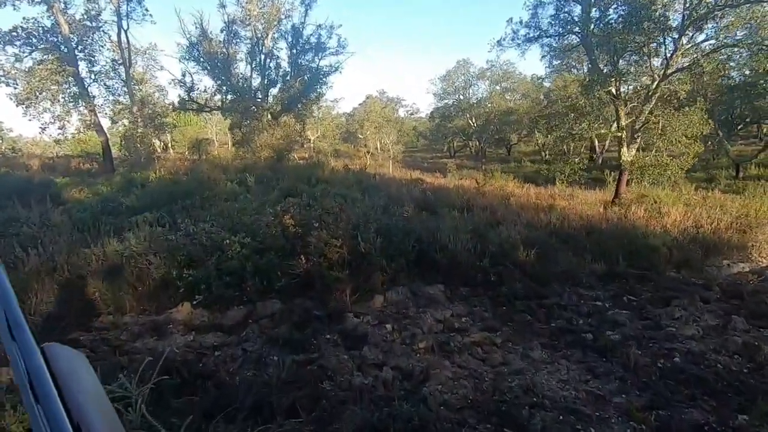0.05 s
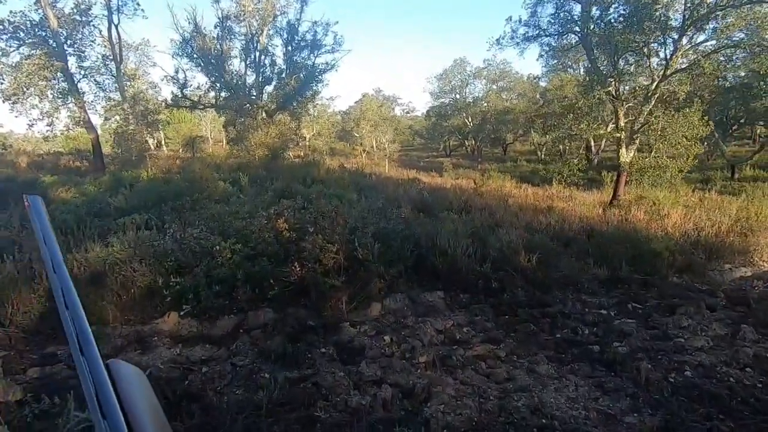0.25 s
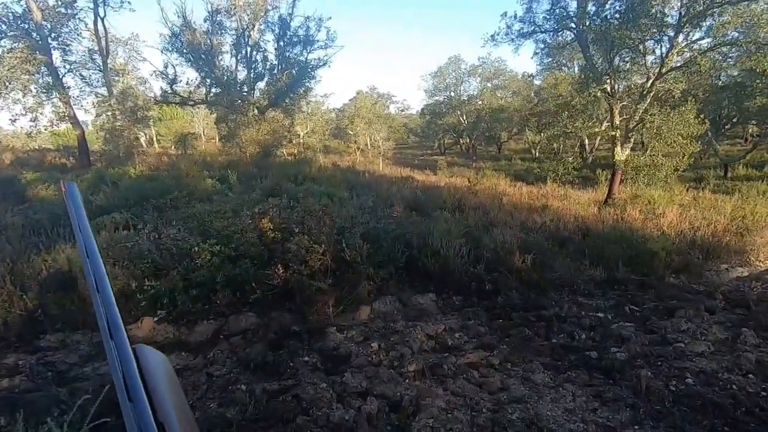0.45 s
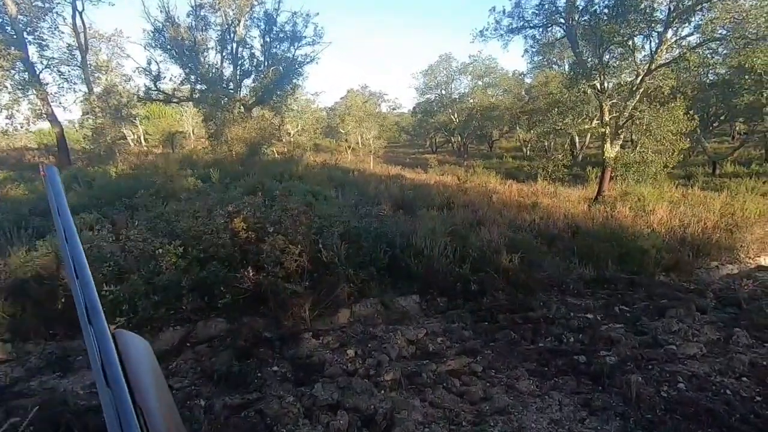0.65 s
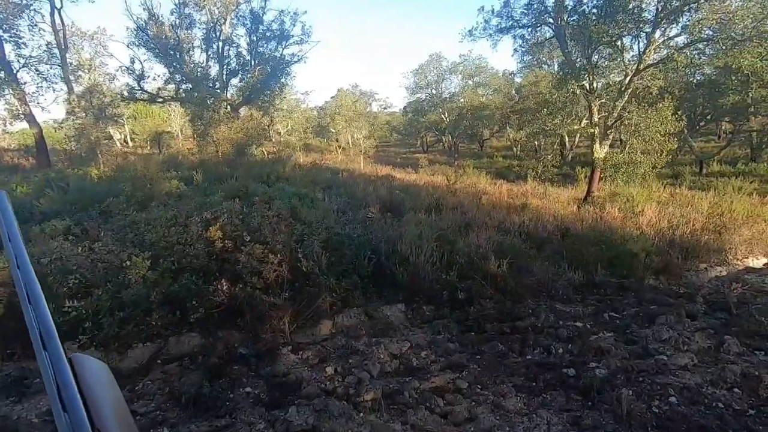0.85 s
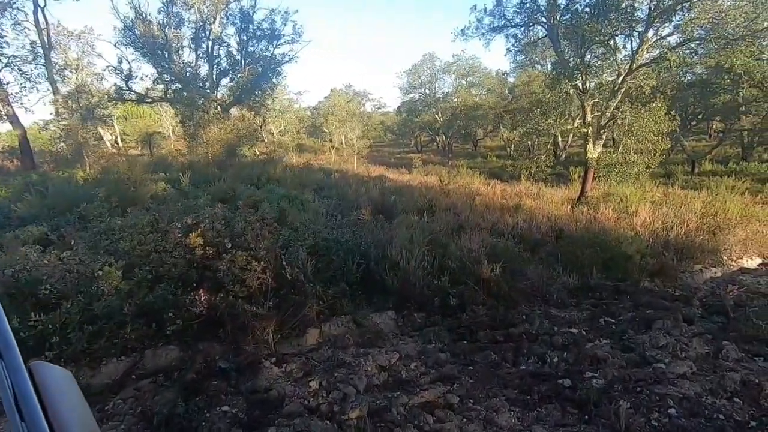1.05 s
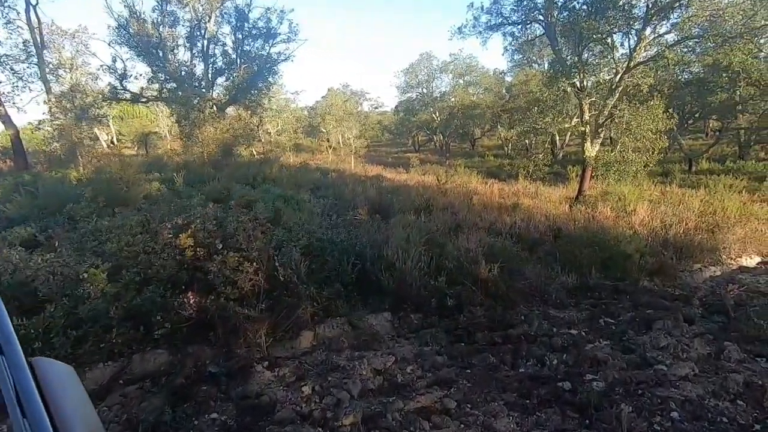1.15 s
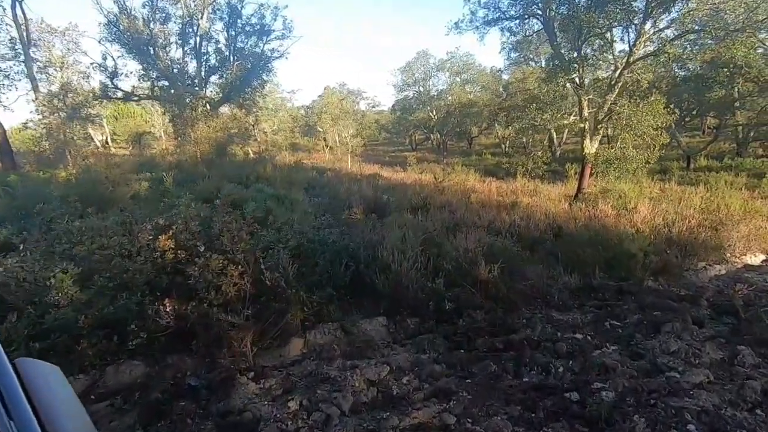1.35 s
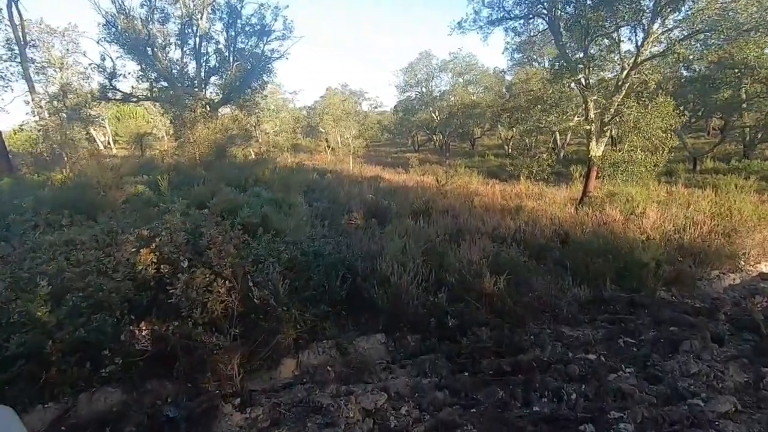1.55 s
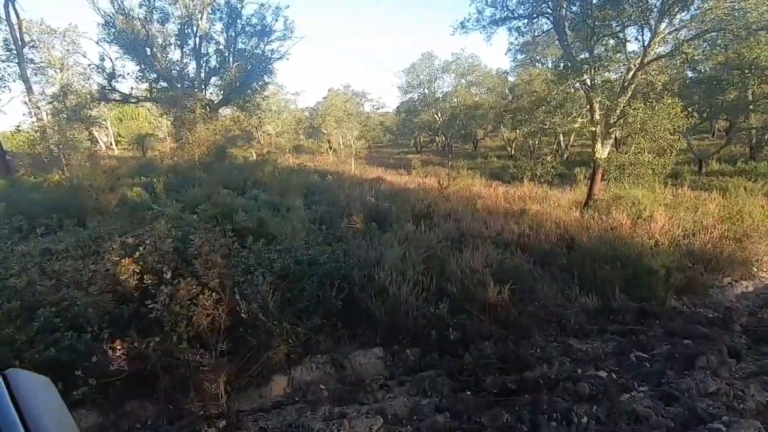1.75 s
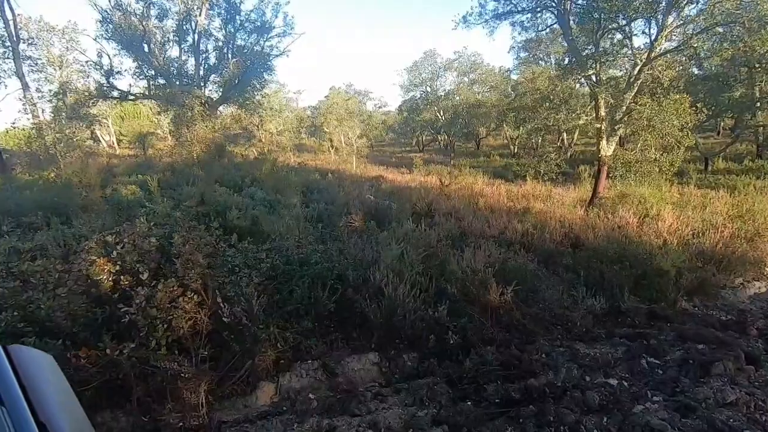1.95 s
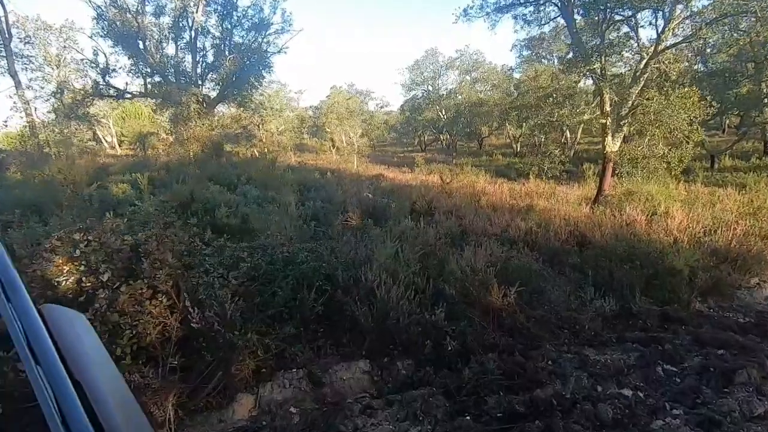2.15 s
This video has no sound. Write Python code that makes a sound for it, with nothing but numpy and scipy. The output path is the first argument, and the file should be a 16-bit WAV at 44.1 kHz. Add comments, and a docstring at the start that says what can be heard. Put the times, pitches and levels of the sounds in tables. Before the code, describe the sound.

Dull footstep thumps on dry, stony ground rock a body-worn microphone. The heaviest lands at about 0.2 seconds with a short soil crunch, just after a very faint distant hoot. Another thump and crunch come around 0.8 seconds, with a sharp little knock at 0.9. Lighter bumps, a smaller knock and dry stem ticks follow around 1.4 to 1.8, and a soft thump at 2.1. Faint wind rumbles throughout.

```python
"""Dull thumps and crunches of slow steps on dry, stony earth in quiet scrubland.
The walker carries a long gun and a body-worn camera. Each footfall and sway jolts the camera;
soil crunches, stones knock and gear rubs, ringing in its case. Dry stems tick, grass brushes the legs,
a faint hoot sounds far off, and light air rumbles on the microphones."""
import sys
import numpy as np
from scipy import signal
from scipy.fft import rfft, irfft
from scipy.io import wavfile

SR = 44100
rng = np.random.default_rng(int(sys.argv[2]) if len(sys.argv) > 2 else 0)


def store_pcm(level_fs):
    """Save levels as 16-bit WAV."""
    pcm = np.round(np.clip(level_fs, -1, 1) * 32767).astype(np.int16)
    wavfile.write(sys.argv[1], SR, np.atleast_2d(pcm).T)


N = 97020
TIME_S = np.arange(N) / SR
ANTIPHASE = np.array([[1], [-1]])


def thumps():
    """Steps and swaying gear rock the camera; its mount wobbles and a soft thud rides on each jolt."""
    # centre_s, level_db, pitch_hz, half_length_s
    jolts = [(.06, -51, 25.6, 0.04), (0.134, -56, 31.6, 0.093), (0.236, -19.5, 22.4, 0.041),
             (0.329, -40.5, 19.4, 0.052), (0.439, -42, 24.3, 0.021), (0.743, -41.5, 26.2, 0.049),
             (0.831, -31.5, 20, 0.021), (0.896, -35.5, 21.8, 0.054), (0.998, -50.5, 31, 0.023),
             (1.115, -38.5, 28.5, 0.028), (1.179, -45, 25.4, 0.041), (1.414, -44, 34.3, 0.031),
             (1.535, -50.5, 14.6, 0.046), (1.615, -42.5, 21, 0.021), (1.728, -49, 24, 0.019),
             (1.801, -42, 19, 0.037), (1.922, -48, 27, 0.025), (2.033, -51.5, 28.4, 0.057),
             (2.121, -36.5, 27.8, 0.031), (2.195, -40, 20.3, 0.012)]
    wobble_hz, wobble_db, thud_db = 45.8, -17, -38.5
    rocking, force = 0, 0
    for centre_s, level_db, pitch_hz, half_length_s in jolts:
        swell = np.exp(-((TIME_S - centre_s) / half_length_s) ** 2)
        rad_per_hz = 2 * np.pi * (TIME_S - centre_s)
        wobble = from_db(wobble_db) * swell ** 2 * np.sin(wobble_hz * rad_per_hz)
        rocking += from_db(level_db) * (swell * np.sin(pitch_hz * rad_per_hz) + wobble)
        force += from_db(level_db) * swell
    thud = band(stereo(white(), likeness=0.9), low_hz=63, high_hz=141.5)
    return pan(-4) * (rocking + from_db(thud_db) * force * thud)


def crunches():
    """Crunching soil and rubbing gear: short runs of dense grains excite the camera's case."""
    # start_s, length_s, level_db, tilt_db_per_octave
    runs = [(0.166, .004, -66, 3), (0.183, 0.015, -57.5, -5.5), (0.196, 0.04, -52.5, -7),
            (0.237, 0.033, -65, -2), (0.273, 0.019, -57.5, -6.5), (0.295, 0.015, -63.5, -5.5),
            (0.314, 0.024, -59.5, -5), (0.341, 0.012, -69.5, -1.5), (0.364, 0.026, -65.5, -4),
            (0.393, 0.064, -76, -2.5), (0.693, 0.054, -74, 1), (0.752, 0.11, -74.5, -2),
            (0.828, 0.013, -62.5, -4.5), (0.843, 0.013, -56, 0.5), (0.86, 0.013, -54, -4.5),
            (0.879, 0.022, -62.5, -3.5), (0.896, 0.011, -52.5, -6), (0.908, 0.011, -59, -3.5),
            (0.921, 0.0067, -56.5, -5), (0.942, 0.03, -67.5, -3), (.975, .03, -68, -1.5),
            (1.011, .035, -66, -2), (1.064, .012, -67, -2), (1.238, .01, -71, -1),
            (1.442, .036, -70.5, -1.5), (1.621, 0.031, -71, -1), (1.645, 0.024, -65.5, -5),
            (1.67, 0.013, -67, 0.5), (1.689, 0.013, -70, -4), (1.719, 0.015, -70.5, -4.5),
            (1.736, 0.014, -71.5, -5.5), (1.913, 0.026, -76, -2.5), (2.028, 0.035, -74.5, -.5)]
    # centre_hz, width_hz, gain_db, stereo_likeness, pan_db
    case_modes = [(149, 82, -23, 0.59, -3.5), (491, 126, -15.5, 0.083, 2), (795, 230, -1.5, -0.51, -1.5),
                  (1009, 99, -4, -0.5, 0), (1252, 176, 3.5, -0.62, -2), (1596, 190, -5.5, 0.073, -6),
                  (2200, 380, -16.5, -1.1, 10.5), (2860, 324, -4.5, -0.29, 2.5), (4710, 2900, -29, 1, -10)]
    grains_per_s, spread_db, pivot_hz, boost_db = 4100, -3.5, 956, 2
    sizes = from_db(spread_db * np.minimum(rng.exponential(1, (2, N)), 4))
    signs = rng.choice([-1, 1], (2, N))
    grains = sizes * signs * (rng.random((2, N)) < grains_per_s / SR)
    envelopes = np.array([burst(start_s, length_s, attack_s=0.003, release_s=0.004)
                          for start_s, length_s, _, _ in runs])
    _, _, level_db, tilt_db = np.transpose(runs)
    out = 0
    for centre_hz, width_hz, gain_db, likeness, pan_db in case_modes:
        force = from_db(level_db + gain_db + tilt_db * np.log2(centre_hz / pivot_hz)) @ envelopes
        ring = band(stereo(grains, likeness), centre_hz - width_hz / 2, centre_hz + width_hz / 2)
        out += force * pan(pan_db) * ring
    return from_db(boost_db) * out


def knocks():
    """Stones and gear each ring one case resonance, pushing the two microphones opposite ways."""
    # start_s, level_db, pitch_hz, pan_db
    contacts = [(0.842, -57.5, 2926, 22.5), (.855, -60, 3000, 5.5), (0.8922, -26, 1238, -4.5),
                (0.952, -44, 1316, -3.5), (1.626, -43.5, 1270, -4)]
    rings = 0
    for start_s, level_db, pitch_hz, pan_db in contacts:
        envelope = from_db(level_db) * burst(start_s, 0, attack_s=0.0037, release_s=0.004)
        rings += pan(pan_db) * envelope * np.sin(2 * np.pi * pitch_hz * (TIME_S - start_s))
    return ANTIPHASE * rings


def grit():
    """Loose soil settles under the first step with a soft hiss."""
    hiss = band(white(), low_hz=3300, high_hz=5400)
    return from_db(-80) * burst(start_s=0.19, length_s=0.1, attack_s=0.02, release_s=0.056) * hiss


def strap():
    """The camera's strap shifts with a muffled rub as the body leans into a step."""
    # start_s, length_s, level_db
    rubs = [(0.037, 0.22, -77), (0.645, 0.088, -77), (0.877, 0.11, -84.5), (1.662, 0.083, -86),
            (2.04, 0.21, -79)]
    force = sum(from_db(level_db) * burst(start_s, length_s, attack_s=0.021, release_s=0.0093)
                for start_s, length_s, level_db in rubs)
    return force * band(stereo(white(), likeness=0.9), low_hz=133, high_hz=210)


def dry_grass():
    """Stems snap with tiny bright ticks; grass brushes the legs."""
    # start_s, relative_db
    snaps = [(0.189, -64), (0.7185, -69.5), (0.84, -65.5), (1.46, -60.5), (1.647, -65), (1.676, -60)]
    # freq_hz, gain_db
    snap_spectrum = [(1500, -26), (3000, 7), (4500, -4.5), (6300, -1.5), (7300, -9), (8600, 0.5),
                     (9700, -8.5), (10500, -22.5), (15000, -22.5)]
    # start_s, length_s, level_db
    brushes = [(.14, .05, -87.5), (0.666, 0.16, -84.5), (1.557, 0.16, -85.5)]
    # freq_hz, gain_db
    brush_spectrum = [(2000, -14), (4000, -2), (6300, -1.5), (7300, -11.5), (8400, -0.5), (9700, -5),
                      (10700, -48), (15000, -20)]
    snapping = sum(from_db(relative_db) * burst(start_s, 0, attack_s=0.00032, release_s=0.006)
                   for start_s, relative_db in snaps)
    brushing = sum(from_db(level_db) * burst(start_s, length_s, attack_s=0.01, release_s=0.066)
                   for start_s, length_s, level_db in brushes)
    return 0.5 * snapping * noise(snap_spectrum) + brushing * noise(brush_spectrum)


def hoot():
    """One faint, wavering note far off; it sags, then swells and lifts."""
    # time_s, pitch_hz, level_db
    contour = [(0, 502, -70), (.022, 509, -81), (.055, 492, -83), (.085, 495, -74.5), (.12, 481, -66),
               (.145, 518, -64.5), (.17, 490, -88), (.2, 500, -101)]
    waver, flutter_db, right_lag_rad = 0.02, 2.5, 0.83
    times_s, pitches_hz, levels_db = np.transpose(contour)
    pitch_hz = np.interp(TIME_S, times_s, pitches_hz) * (1 + waver * drift(rate_hz=110))
    level_db = np.interp(TIME_S, times_s, levels_db) + flutter_db * drift(rate_hz=44)
    phase_rad = 2 * np.pi * np.cumsum(pitch_hz) / SR - np.array([[0], [right_lag_rad]])
    return from_db(level_db) * (TIME_S < times_s[-1]) * np.sin(phase_rad)


def air():
    """A steady hush coloured by the case, over a gusty rumble on the microphones."""
    # freq_hz, gain_db
    hush_spectrum = [(100, -7), (170, -1.5), (280, -7), (520, -8.5), (660, -1), (830, 2), (1000, -4.5),
                     (1280, -1), (1480, -5), (1680, -1.5), (2000, -11.5), (2350, -15), (2850, -8.5),
                     (3500, -18.5), (5000, -20), (7300, -26), (9200, -23), (10500, -31.5), (15000, -34.5)]
    # freq_hz, stereo_likeness
    hush_likeness = [(100, -0.8), (300, 0.63), (500, -0.37), (780, -0.63), (1200, 0.29), (1700, 0.62),
                     (2800, 1), (9000, 0.11)]
    # freq_hz, gain_db
    wind_spectrum = [(10, 1.5), (22, 0.5), (40, -3.5), (60, -10.5), (90, -44.5), (160, -56), (400, -72)]
    hush = from_db(-71.7) * noise(hush_spectrum, at_bins(hush_likeness))
    gust_db = 2 * drift(rate_hz=2.1)
    rumble = from_db(-69.5 + gust_db) * noise(wind_spectrum, likeness=0.93)
    return pan(-1.2) * (hush + rumble)


def from_db(db):
    """Decibels to gain."""
    return 10 ** (np.asarray(db) / 20)


def unit_rms(x):
    """Scale to unit power."""
    return x / np.sqrt(np.mean(x ** 2) + 1e-20)


def pan(pan_db):
    """Channel gains for a left-minus-right level."""
    return from_db([[pan_db / 2], [-pan_db / 2]])


def at_bins(points):
    """Interpolate (freq_hz, value) points onto the FFT bins along log frequency."""
    freq_hz, values = np.transpose(points)
    bins_hz = np.fft.rfftfreq(N, 1 / SR)
    return np.interp(np.log(bins_hz + 1e-9), np.log(freq_hz), values)


def stereo(pair, likeness):
    """Mix two independent signals to left and right; likeness 1 is mono, -1 antiphase."""
    likeness = np.clip(likeness, -1, 1)
    return np.sqrt(1 + likeness) * pair[0] + np.sqrt(1 - likeness) * pair[1] * ANTIPHASE


def white():
    """Two independent white noises."""
    return rng.standard_normal((2, N))


def noise(spectrum, likeness=0):
    """Coloured stereo noise at unit power."""
    return unit_rms(irfft(stereo(rfft(white()), likeness) * from_db(at_bins(spectrum)), N))


def band(x, low_hz, high_hz):
    """Band-pass, then scale to unit power."""
    sos = signal.butter(2, [low_hz, high_hz], "band", fs=SR, output="sos")
    return unit_rms(signal.sosfilt(sos, x + 1e-18))


def drift(rate_hz):
    """Random wander with spread near 1."""
    return np.interp(TIME_S * rate_hz, np.arange(512), rng.standard_normal(512))


def burst(start_s, length_s, attack_s, release_s):
    """Linear rise; exponential decay begins length_s after the start."""
    age_s = TIME_S - start_s
    return np.clip(age_s / attack_s, 0, 1) * np.exp(-np.maximum(age_s - length_s, 0) / release_s)


def scene():
    """All sources in open air, without echo."""
    return thumps() + crunches() + grit() + knocks() + strap() + dry_grass() + hoot() + air()


def record(dry):
    """Steep low-pass."""
    cutoff_hz = 15000
    return signal.sosfilt(signal.butter(14, cutoff_hz, fs=SR, output="sos"), dry)


dry = scene()
out = record(dry)
store_pcm(out)
```